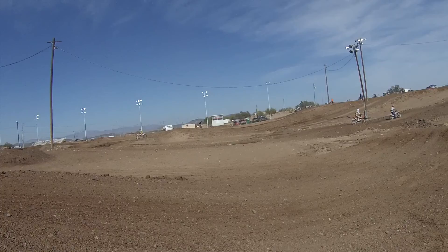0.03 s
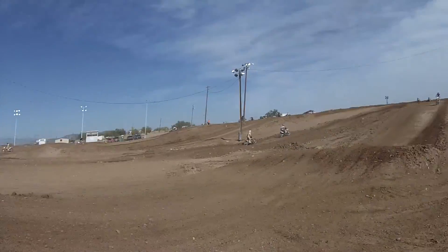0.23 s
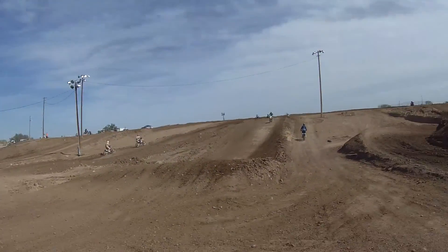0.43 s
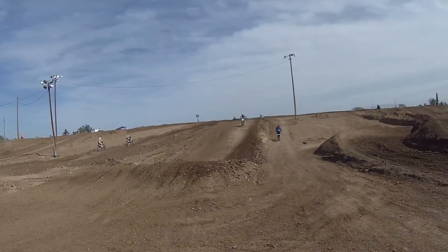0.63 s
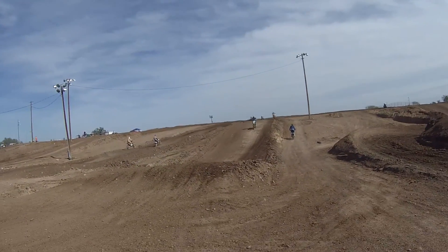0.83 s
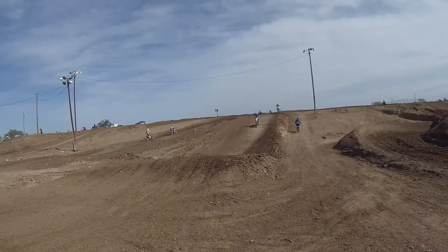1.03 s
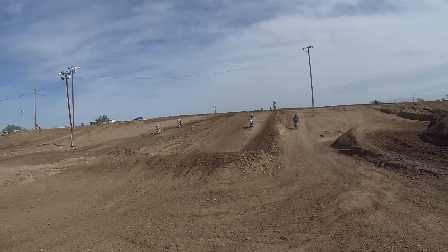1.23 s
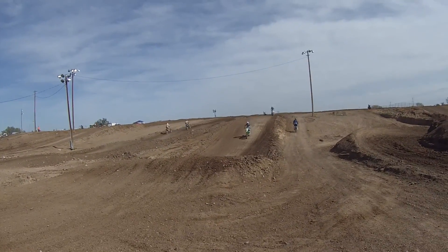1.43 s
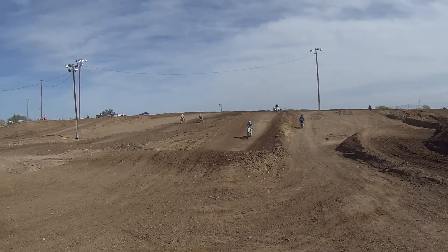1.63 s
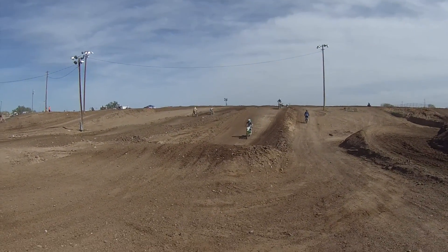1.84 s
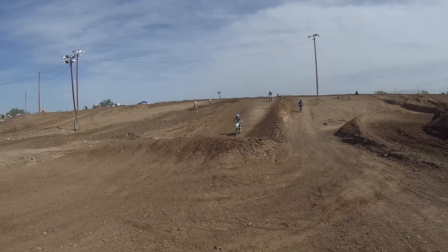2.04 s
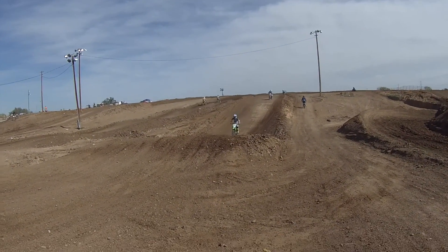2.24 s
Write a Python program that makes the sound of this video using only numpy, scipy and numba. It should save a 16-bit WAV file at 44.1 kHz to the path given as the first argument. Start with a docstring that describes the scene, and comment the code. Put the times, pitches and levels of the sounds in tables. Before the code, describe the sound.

Distant dirt bike engines bark in quick crackling bursts over a low idling throb, then fall back to faint popping and droning. The outdoor microphone picks up light wind and a few dull bumps near the end.

```python
"""An open dirt track, with bikes heard from a distance. Each of five throttle bursts is a train of sharp
exhaust cracks with a rasp of gas after every firing; off the throttle the engines pop unevenly.
A slow throb, like an idling engine, lies under the first bursts. Far engines drone and blip, light wind
rumbles and three soft bumps land on the microphone. Everything rings in the microphone housing."""
import sys
import numpy as np
from scipy import signal
from scipy.fft import rfft, irfft
from scipy.io import wavfile
from numba import njit

SR = 44100
rng = np.random.default_rng(int(sys.argv[2]) if len(sys.argv) > 2 else 0)


def generate_wav(sig):
    """Save sig (samples, or channels by samples) to the path in sys.argv[1] as 16-bit PCM at SR."""
    pcm = np.round(np.clip(np.atleast_2d(sig).T, -1, 1) * 32767).astype(np.int16)
    wavfile.write(sys.argv[1], SR, pcm)


N = 101429
T = np.arange(N) / SR
EXHAUST_LOW_CUT_HZ = 246

# The five throttle bursts. Each row: time in seconds, firing rate in Hz, bark in dB, treble in dB.
THROTTLE_1 = [(.105, 111.4, -36, -55.5), (.135, 119.9, -35.5, -55), (.17, 133.8, -33, -50.5),
              (.22, 138.6, -33, -46), (.29, 141.7, -36, -47.5), (.32, 138.3, -38.5, -52.5),
              (.352, 127, -43, -60.5)]
THROTTLE_2 = [(.36, 125.9, -44.5, -62), (.41, 113.8, -43.5, -57), (0.471, 120.4, -43.5, -55.5),
              (.52, 121.4, -39, -47.5), (0.56, 122.4, -39, -49.5), (.605, 129.4, -36, -46.5),
              (.642, 130.8, -41.5, -55.5)]
THROTTLE_3 = [(.655, 109, -52, -59), (.7, 118.5, -44, -65), (0.735, 131.3, -41, -60.5),
              (0.806, 148, -42, -60.5)]
THROTTLE_4 = [(1.032, 101, -46, -66.5), (1.08, 126.4, -33.5, -57.5), (1.12, 139, -35, -53.5),
              (1.169, 155.8, -34, -56), (1.2, 137.9, -37, -58), (1.226, 128, -36.5, -58),
              (1.255, 138.8, -37, -58), (1.286, 126.1, -39.5, -59.5), (1.343, 122, -43, -61.5)]
THROTTLE_5 = [(1.925, 140.8, -51, -73), (2.011, 150.2, -46.5, -64), (2.059, 152, -54, -81)]
# The exhaust's tone in each burst. Each row: frequency in Hz, gain in dB.
EXHAUST_EQ_1 = [(350, -12), (620, -13), (900, -8.5), (1350, -1), (2300, -3), (2700, 1.5), (3200, -6.5),
                (4100, -5.5), (5000, -10), (6200, -5), (7900, -13), (14000, -29)]
EXHAUST_EQ_2 = [(650, -16), (860, -10.5), (1290, -7), (1950, -9), (2400, -7), (3080, -13.5), (4780, -20.5),
                (7900, -28), (8900, -43.5), (11900, -44), (15000, -58)]
EXHAUST_EQ_3 = [(600, -14), (900, -1.5), (1290, 0.5), (1750, -4), (2800, -11), (3300, -16), (7500, -25),
                (12000, -54), (14500, -58)]
EXHAUST_EQ_4 = [(620, -17.5), (850, -4), (1250, 0), (1650, -5), (2400, 3), (3250, -6.5), (3550, -13),
                (4800, -10.5), (7300, -19), (9200, -36), (12500, -41), (14500, -48)]
EXHAUST_EQ_5 = [(600, -18.5), (1300, 0.5), (1750, 4.5), (2200, -5), (3400, -10), (5000, -7.5), (5800, -26),
                (7200, -12), (10000, -36)]
# The grit of each burst. Each row: rasp send in dB, scatter send in dB.
BURST_GRIT = [(-2, -0.5), (-6.5, 2.5), (-8, 5), (-7.5, 0), (-4, 8)]
# The path of a bright peak in the exhaust. Each row: time in seconds, centre in Hz.
SHEEN_SWEEP = [(.12, 4120), (.18, 4600), (.22, 5900), (.5, 7300), (1.12, 7600), (1.24, 6040)]
# The clean low note of the pipes. Each row: frequency in Hz, gain in dB.
NOTE_EQ = [(290, -21), (420, 8), (600, -7.5), (900, -32)]
# Far bikes, mostly off the throttle. Each row: time in seconds, bark in dB, treble in dB.
COAST_LEVELS = [(.82, -51.5, -62), (1.0, -52, -68.5), (1.4, -52, -69), (1.66, -53, -68), (1.8, -56, -66.5),
                (2.3, -55.5, -72)]
# Their tone. Each row: frequency in Hz, gain in dB.
COAST_EQ = [(350, -3), (1030, -3), (1240, 1.5), (1690, -3.5), (2450, -4), (3040, -10), (4270, -13),
            (14000, -58.5)]
# Faders for the deep wind and the engine rumble above it. Each row: time in seconds, level in dB.
WIND_FADER = [(.1, -56), (.8, -42.5), (.88, -55), (1.2, -65), (2.3, -71)]
RUMBLE_FADER = [(.6, -45), (.85, -51.5), (1.55, -50), (1.9, -52), (2.3, -52.5)]
# Their tones. Each row: frequency in Hz, gain in dB.
WIND_EQ = [(15, -7.5), (30, -1), (70, -9), (500, -61)]
RUMBLE_EQ = [(40, -13), (75, 1), (140, 1), (290, -14), (380, -7.5), (1600, -66)]
# Faders for the throb's knocks and boom. Each row: time in seconds, level in dB.
KNOCK_FADER = [(.1, -40.5), (.3, -38), (.51, -41), (.6, -55)]
BOOM_FADER = [(.58, -35.5), (.63, -38.5), (.7, -67)]
# The dull body of a knock. Each row: frequency in Hz, gain in dB.
KNOCK_EQ = [(60, 0), (160, 2), (290, -3.5), (340, -2.5), (450, -17.5), (900, -16.5), (4000, -84)]
# The shut throttle after burst three leaves only every other firing.
# Each row: time in seconds, firing rate in Hz, bark in dB, treble in dB.
THROTTLE_SHUT = [(.822, 61.5, -52, -73), (.955, 63.96, -53.5, -76)]
# Notes of the farthest engines. Each row: start in seconds, end in seconds, pitch in Hz, level in dB.
DRONE_NOTES = [(1.26, 1.423, 184, -53.5), (1.613, 2.354, 165, -52.5), (1.679, 2.148, 99, -53)]
# Bumps at the microphone. Each row: start in seconds, starting level in dB, pitch in Hz.
MIC_BUMPS = [(1.414, -34, 191), (1.918, -28, 127), (2.22, -33, 356)]
# Throttle blips of far bikes. Each row: time of the peak in seconds, bark in dB.
BLIP_CUES = [(1.609, -57), (1.785, -58.5), (1.875, -56)]
# Their thin tone. Each row: frequency in Hz, gain in dB.
BLIP_EQ = [(900, -42), (1300, 1), (3000, -11), (4600, -1), (6000, -23)]
# Resonances and dips of the microphone housing. Each row: centre in Hz, width in Hz, gain in dB.
HOUSING_EQ = [(1295, 133, 7), (2313, 81, 7), (2896, 126, 7.5), (3014, 77, -18), (3210, 99, 6.5),
              (4730, 136, 6.5), (5370, 830, -3)]


def from_db(db):
    """Decibels to gain."""
    return 10 ** (np.asarray(db) / 20)


def rms_one(x, weights=None):
    """Scale to unit rms, optionally weighted over time."""
    return x / np.sqrt(np.average(x ** 2, weights=weights) + 1e-20)


def automation(rows):
    """A curve through each column after the time, held flat at both ends."""
    times, *columns = np.transpose(rows)
    return [np.interp(T, times, column) for column in columns]


def window(start, end, fade_s):
    """A gate, open from start to end, with linear fades outside."""
    return np.clip(1 + np.minimum(T - start, end - T) / fade_s, 0, 1)


def cut(x, hz, kind, order=2):
    """Butterworth low- or high-pass."""
    return signal.sosfilt(signal.butter(order, hz, kind, fs=SR, output="sos"), x)


def equalise(x, eq):
    """Minimum-phase EQ: it rings only after each hit."""
    size = 8192
    hz, db = np.transpose(eq)
    bin_hz = np.maximum(np.arange(size // 2 + 1) * SR / size, 1)
    gain = from_db(np.interp(np.log(bin_hz), np.log(hz), db))
    cepstrum = irfft(np.log(gain))
    cepstrum[1:size // 2] *= 2
    cepstrum[size // 2 + 1:] = 0
    impulse_response = irfft(np.exp(rfft(cepstrum)))
    return signal.fftconvolve(x, impulse_response)[:N]


def clicks(times, sizes):
    """Impulses at the given times, shared between neighbouring samples."""
    at = np.clip(np.asarray(times) * SR, 0, N - 2)
    i = at.astype(int)
    return np.bincount(i, sizes * (1 - at + i), N) + np.bincount(i + 1, sizes * (at - i), N)


def noise():
    """White noise."""
    return rng.standard_normal(N)


@njit
def gliding_band(x, angle, radius):
    """A band-pass whose centre, in radians per sample, moves at every sample."""
    out = np.zeros(len(x))
    for i in range(2, len(x)):
        drive = (1 - radius ** 2) / 2 * (x[i] - x[i - 2])
        out[i] = drive + 2 * radius * np.cos(angle[i]) * out[i - 1] - radius ** 2 * out[i - 2]
    return out


def engine_firings(rate_hz, start, jitter_s=.00002, spread_db=.95):
    """One click per engine cycle, each a little off in time and strength."""
    cycles = np.cumsum(rate_hz) / SR
    cycles -= np.interp(start, T, cycles)
    times = np.interp(np.arange(int(cycles[-1])), cycles, T)
    timing, strength = rng.standard_normal((2, len(times)))
    return clicks(times + jitter_s * timing, from_db(spread_db * strength))


def rasp(pulses, decay_s=.0036):
    """A puff of turbulent gas that dies away after each pulse."""
    envelope = signal.lfilter([1], [1, -np.exp(-1 / (decay_s * SR))], pulses + 1e-18)
    return rms_one(noise() * envelope)


def ground_scatter(x, send_db, t60_s=.046, above_hz=2400):
    """Rough ground and dirt banks scatter mainly the treble, adding a short diffuse tail."""
    tail = noise() * from_db(-60 * T / t60_s)
    wet = signal.fftconvolve(x, tail / np.linalg.norm(tail))[:N]
    return x + from_db(send_db) * cut(wet, above_hz, "high", order=1)


def pipe_smear(x, hz=2600, width_hz=2900):
    """The pipe delays the mids of each crack a little: an allpass."""
    radius = np.exp(-np.pi * width_hz / SR)
    feedback = [1, -2 * radius * np.cos(2 * np.pi * hz / SR), radius ** 2]
    return signal.lfilter(feedback[::-1], feedback, x)


def sheen(x, width_hz=1800, mix=.56):
    """A bright peak glides through the treble as bikes and microphone turn."""
    hz, = automation(SHEEN_SWEEP)
    return x + mix * gliding_band(x, 2 * np.pi * hz / SR, np.exp(-np.pi * width_hz / SR))


def engine_load(x, bark_db, treble_db, gate, crossover_hz=5380):
    """The bark below the crossover and the treble above it each ride their own fader."""
    lowpassed = cut(x, crossover_hz, "low", order=4)
    bark = cut(lowpassed[::-1], crossover_hz, "low", order=4)[::-1]  # backwards, to stay in phase
    treble = x - bark
    return gate * (from_db(bark_db) * rms_one(bark, gate) + from_db(treble_db) * rms_one(treble, gate))


def pipe_note(firings, bark_db, gate, offset_db=-15.5, follow=.3):
    """The low harmonics stay clean and swell less with the throttle than the bark does."""
    mean_db = np.average(bark_db, weights=gate)
    level = from_db(mean_db + offset_db + follow * (bark_db - mean_db))
    return gate * level * rms_one(equalise(firings, NOTE_EQ), gate)


def exhaust_burst(throttle, eq, rasp_db, scatter_db):
    """A run of firings, each a crack and a rasp through the exhaust, over the pipe's low note."""
    start, end = throttle[0][0], throttle[-1][0]
    rate_hz, bark_db, treble_db = automation(throttle)
    firings = engine_firings(rate_hz, start)
    turbulence = from_db(rasp_db) * cut(rasp(firings), 1300, "high")
    cracks = ground_scatter(rms_one(firings) + turbulence, scatter_db)
    piped = pipe_smear(equalise(cracks, eq))
    exhaust = cut(sheen(piped), EXHAUST_LOW_CUT_HZ, "high")
    gate = window(start, end, fade_s=.015)
    return engine_load(exhaust, bark_db, treble_db, gate) - pipe_note(firings, bark_db, gate)


def coasting_bikes(pops_per_s=110, spread_db=4, pop_send_db=-6):
    """Uneven, dull exhaust pops in a constant wash of far engine noise."""
    hits = rng.random(N) < pops_per_s / SR
    pops = hits * from_db(-spread_db * np.clip(noise(), -2, 1))
    raspy = rms_one(rms_one(pops) + rasp(pops))
    dull = cut(pipe_smear(raspy), 2930, "low")
    wash = equalise(from_db(pop_send_db) * dull + noise(), COAST_EQ)
    exhaust = cut(wash, EXHAUST_LOW_CUT_HZ, "high")
    return engine_load(exhaust, *automation(COAST_LEVELS), gate=np.ones(N))


def rumble(fader, eq):
    """Low noise of wind or engines that swells and sinks."""
    level_db, = automation(fader)
    return from_db(level_db) * rms_one(equalise(noise(), eq))


def idle_throb(start=.1195, cycle_hz=23.75, gap_s=.01023):
    """A double knock every cycle over a boom at twice the cycle rate."""
    times = np.arange(start, T[-1], 1 / cycle_hz)
    strokes = clicks(times, .85) - clicks(times + gap_s, from_db(-.5))
    knocks = rms_one(equalise(strokes, KNOCK_EQ))
    boom = -np.sqrt(2) * np.sin(2 * np.pi * 2 * cycle_hz * (T - start))
    knock_db, = automation(KNOCK_FADER)
    boom_db, = automation(BOOM_FADER)
    return from_db(knock_db) * knocks + from_db(boom_db) * boom


def far_drones(waver_depth=.0188, waver_below_hz=13):
    """Only the wavering firing note of the farthest engines arrives."""
    out = np.zeros(N)
    for start, end, hz, db in DRONE_NOTES:
        waver = rms_one(cut(noise(), waver_below_hz, "low"))
        pitch = hz * (1 + waver_depth * waver)
        tone = np.sqrt(2) * np.sin(2 * np.pi * np.cumsum(pitch) / SR)
        out += from_db(db) * tone * window(start, end, fade_s=.018)
    return out


def mic_bumps(t60_s=.022):
    """Dull thuds at the microphone, each a low sine that dies at once."""
    out = np.zeros(N)
    for start, db, hz in MIC_BUMPS:
        age = np.maximum(T - start, 0)
        out += from_db(db - 60 * age / t60_s) * np.sin(2 * np.pi * hz * age)
    return out


def far_blip(peak_s, peak_db, firing_hz=127.7, rise_s=.032, swell_db=9, treble_offset_db=-23):
    """A flick of a far throttle: a thin exhaust swells and drops back."""
    edge_db = peak_db - swell_db
    swell = [(peak_s - rise_s, edge_db), (peak_s, peak_db), (peak_s + rise_s, edge_db)]
    throttle = [(time, firing_hz, db, db + treble_offset_db) for time, db in swell]
    return exhaust_burst(throttle, BLIP_EQ, rasp_db=-1, scatter_db=11)


def slope_reflection(x, lag_s=.001186, db=-8):
    """A bounce off the slope arrives just behind the direct sound and combs it."""
    gain = from_db(db)
    bounce = gain * np.interp(T - lag_s, T, x)
    return (x + bounce) / np.sqrt(1 + gain ** 2)


def scene():
    """Five throttle bursts up front, over the far bikes, the low end and a faint hiss."""
    throttles = THROTTLE_1, THROTTLE_2, THROTTLE_3, THROTTLE_4, THROTTLE_5
    eqs = EXHAUST_EQ_1, EXHAUST_EQ_2, EXHAUST_EQ_3, EXHAUST_EQ_4, EXHAUST_EQ_5
    *earlier, last = [exhaust_burst(throttle, eq, *grit)
                      for throttle, eq, grit in zip(throttles, eqs, BURST_GRIT)]
    bikes = sum(earlier) + slope_reflection(last)
    overrun = exhaust_burst(THROTTLE_SHUT, EXHAUST_EQ_3, rasp_db=-4, scatter_db=2)
    far = coasting_bikes() + far_drones() + sum(far_blip(*cue) for cue in BLIP_CUES)
    lows = rumble(WIND_FADER, WIND_EQ) + rumble(RUMBLE_FADER, RUMBLE_EQ) + idle_throb() + mic_bumps()
    hiss = from_db(-75) * noise()
    return (bikes + overrun + far + lows + hiss)[None]


def record(dry, open_at_s=.104, top_hz=15000):
    """The housing rings, the microphone opens after a moment, the top is rolled off."""
    for hz, width_hz, db in HOUSING_EQ:
        width = np.pi * width_hz / SR
        centre = -2 * np.cos(2 * np.pi * hz / SR)
        gain = from_db(db / 2)
        feedforward = [1 + width * gain, centre, 1 - width * gain]
        feedback = [1 + width / gain, centre, 1 - width / gain]
        dry = signal.lfilter(feedforward, feedback, dry)
    high_cut = signal.ellip(10, .1, 80, top_hz, fs=SR, output="sos")
    return signal.sosfilt(high_cut, dry * window(open_at_s, T[-1], fade_s=.002))


dry = scene()
out = record(dry)
generate_wav(out)
```